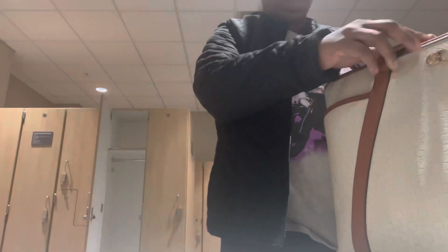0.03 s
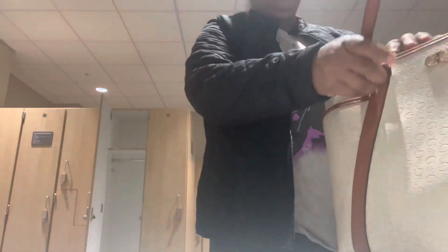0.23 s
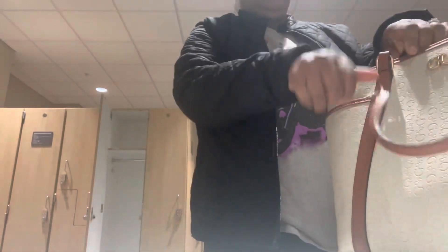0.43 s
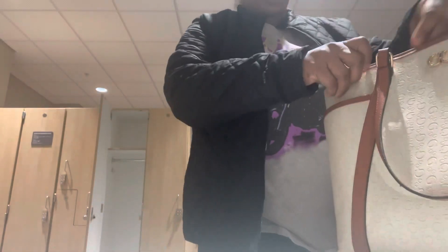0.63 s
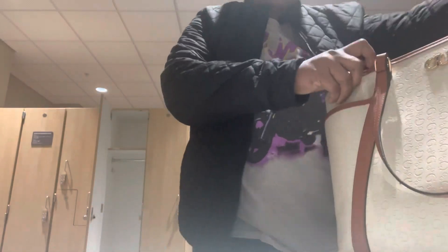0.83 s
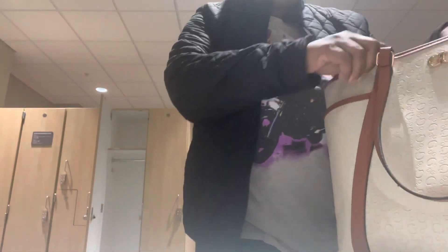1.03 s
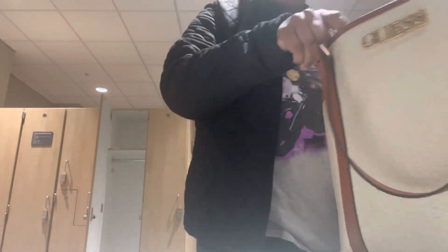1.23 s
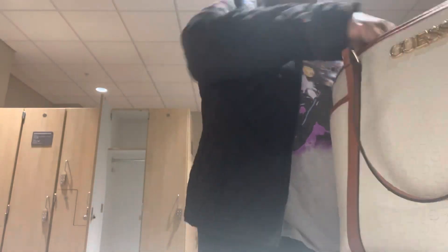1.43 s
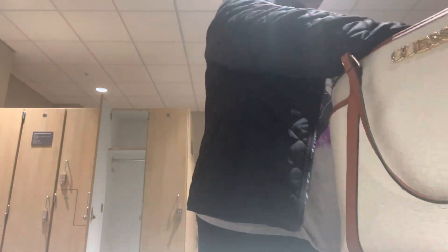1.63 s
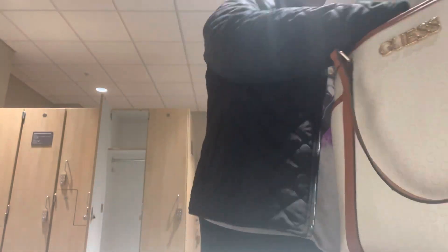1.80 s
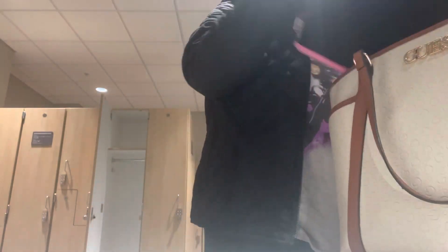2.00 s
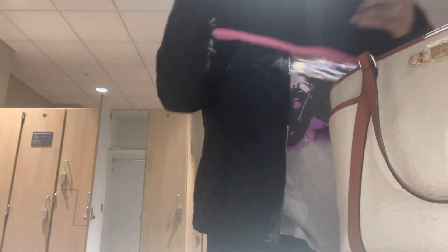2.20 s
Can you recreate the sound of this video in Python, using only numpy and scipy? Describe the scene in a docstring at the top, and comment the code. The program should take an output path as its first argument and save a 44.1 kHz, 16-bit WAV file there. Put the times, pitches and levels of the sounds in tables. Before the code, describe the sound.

A zipper on a stiff tote bag is pulled open close by. First, fingers and straps knock on the bag, near 0.1 seconds and loudest at 0.3. From 0.6 to 0.9 seconds the zipper buzzes, rising then falling in pitch. Softer knocks follow around 1.0 and 1.2 seconds, then light taps and jacket rustling until about 2.2. Ventilation hums steadily in the slightly echoing room.

```python
"""Unzipping a stiff bag

A stiff tote bag is handled close by in a locker room. Fingers and straps knock on its side.
The zipper opens in one quick pull: its teeth click so fast that they make a buzz, which rises
and falls with the speed of the hand. Jacket sleeves rustle over the hum of the ventilation."""
import sys
import numpy as np
from scipy import signal
from scipy.fft import rfft, irfft
from scipy.io import wavfile
from scipy.ndimage import uniform_filter1d

SR = 44100
rng = np.random.default_rng(int(sys.argv[2]) if len(sys.argv) > 2 else 0)


def unload_audio(sound):
    """Save the sound as a 16-bit wav file, at the path given as the first command line argument."""
    columns = np.transpose(np.atleast_2d(sound))
    # keep every value between -1 and 1, then stretch to whole-number steps
    steps = np.round(np.clip(columns, -1, 1) * 32767)
    wavfile.write(sys.argv[1], SR, steps.astype(np.int16))


N = 99401
FFT_SIZE = 2 ** 17
HZ = np.maximum(np.arange(FFT_SIZE // 2 + 1) * SR / FFT_SIZE, 1)


# How the hand pulls the zipper: (time [s], speed [teeth/s], level [dB])
PULL = [(.594, 280, -65), (.598, 290, -39), (.632, 340, -38), (.642, 370, -33.5), (.670, 430, -34),
        (.695, 560, -35), (.722, 750, -31), (.745, 955, -27), (.773, 920, -29), (.787, 1150, -28),
        (.802, 1040, -27), (.821, 1045, -26), (.829, 860, -25), (.844, 720, -28), (.872, 520, -31),
        (.895, 350, -38), (.908, 280, -60)]
# Tone of the clicking teeth and of the scraping slider: (frequency [Hz], level [dB])
TEETH_TONE = [(120, -24), (250, -4.5), (450, -1), (620, -3.5), (950, 0.5), (1400, 0), (2350, -3),
              (3100, -19.5), (4200, -15.5), (5200, -19), (10000, -51), (16000, -35)]
SCRAPE_TONE = [(150, -12), (500, -22), (1000, 12), (1700, 12), (2600, -0.5), (3400, -1), (6500, -8.5),
               (9000, -12), (11000, -24), (15000, -15)]
# The bag sings when a multiple of the zipper's speed meets one of its own notes:
# (multiple, note [Hz], width [Hz], level [dB])
BAG_NOTES = [(1, 412, 60, 3.5), (1, 755, 27, 0.5), (1, 990, 55, -4), (2, 2160, 200, -12.5),
             (4, 4160, 87, -6.5)]

def zipper(teeth_db=-3, scrape_db=-5.5, boom_db=-15, slack_s=.848, fade_db_per_s=800):
    """The slider clicks over each tooth and scrapes between them, while the hollow bag booms along."""
    t = np.arange(N) / SR
    times, speeds, levels = np.transpose(PULL)
    speed = np.interp(t, times, speeds) * (1 + .02 * drift(73))
    teeth_passed = np.cumsum(speed) / SR
    teeth = np.arange(1, int(teeth_passed[-1]))
    # Each click is a little early or late, louder or softer.
    timing, strength = rng.standard_normal((N // 20, 2))[:len(teeth)].T
    click_at = np.interp(teeth + .05 * timing, teeth_passed, np.arange(N)).astype(int)
    clicks = np.zeros(N)
    clicks[click_at] = from_db(3.5 * strength)
    buzz = apply_filter(clicks, tone_filter(curve(TEETH_TONE)) * bending_delay())
    buzz_level = np.sqrt(uniform_filter1d(buzz ** 2, size=900) + 1e-12)
    buzz = from_db(teeth_db) * buzz / buzz_level
    for multiple, hz, width_hz, db in BAG_NOTES:
        fluttering_gain = from_db(db + 3.5 * drift(70)) * resonance(multiple * speed, hz, width_hz)
        buzz += fluttering_gain * np.sin(2 * np.pi * multiple * teeth_passed)
    buzz *= from_db(-fade_db_per_s * np.maximum(t - slack_s, 0))  # the buzz fades as the pull slackens
    friction = rng.standard_normal(N) * np.exp(-2.5 * (teeth_passed % 1))  # a burst after each tooth
    scrape = rms_one(apply_filter(friction, tone_filter(curve(SCRAPE_TONE))))
    scrape *= from_db(scrape_db + .5 * np.log2(speed / speeds.max()))  # faster is a little louder
    hollow = resonance(HZ, centre_hz=182, width_hz=20)
    boom = from_db(boom_db) * rms_one(apply_filter(rng.standard_normal(N), hollow))
    loudness = from_db(np.interp(t, times, levels)) * (t > times[0]) * (t < times[-1])
    return loudness * (buzz + scrape + boom)


# Tone of the bag's stiff side: (frequency [Hz], level [dB])
SIDE_TONE = [(40, -52), (100, 3), (290, 8.5), (520, 5), (760, 7), (1000, 0), (1400, 9), (2000, -2),
             (3000, -9), (4200, -14.5), (6000, -19), (10000, -50), (14000, -25.5)]
# Each knock, with its own tone from low to high and how much of it goes into the room:
# (time [s], level [dB], thump [dB], knock [dB], snap [dB], tick [dB], echo [dB])
KNOCKS = [(0.0495, -33, 3, 2, -6, -22, -3), (0.0677, -29.5, 14, 8.5, 5.5, -4, 14.5),
          (0.0793, -17.5, 10, 9.5, 10.5, -22, 5.5), (.0820, -12, 4, 1, 2, 1, -3),
          (.0885, -15, 10, 3, -3, -6, -3), (0.251, -30.5, 2, -2, 13, -1, -16),
          (0.3244, -8, 8.5, 12, 7, -26, -2.5), (.4075, -25, -8, -4, 1, 5, -7),
          (.4108, -21, -8, -4, 4, 12, -8), (.5340, -20.5, 8, 3, 10.5, 2.5, -13),
          (1.0484, -22, -1.5, -9.5, -14, -6, -6), (1.2060, -23.5, 14.5, 13.5, -27, -10, -1),
          (1.2139, -16, 0, 2, 0, -9, -7), (1.6338, -25, 16, 0, -1, 6.5, -4),
          (1.9153, -24, 7, -5, -23, -12, -24), (2.06, -30, 12, 7.5, 4.5, 15.5, -4),
          (2.1688, -18.5, -27, -23, -21, -26, -3)]

def knocks():
    """Each touch bends the bag's side: a snap, then a thump. Returns the sound and its room share."""
    out, delay = np.zeros((2, N)), bending_delay()
    for time, db, thump, knock, snap, tick, echo in KNOCKS:
        touch = curve([(302, thump), (618, knock), (1160, 0), (2690, snap), (8300, tick)])
        pulse = irfft(tone_filter(curve(SIDE_TONE) + touch) * delay)
        start = int(time * SR)
        out[:, start:] += from_db([[db], [db + echo]]) * pulse[:N - start] / np.abs(pulse).max()
    return out


def bending_delay(lag_s=0.002167, top_hz=2736):
    """A filter for travel through the bag's stiff side, where low sounds move slower than high ones."""
    lag = lag_s * np.maximum(np.sqrt(top_hz / np.maximum(HZ, 200)) - 1, 0)
    return np.exp(-2j * np.pi * np.cumsum(lag) * SR / FFT_SIZE)


def pull_tab(start_s=.411, hz=12100, ring_s=.04, db=-44):
    """The metal tab gives one tiny, high ring as the fingers find it."""
    age = np.maximum(np.arange(N) / SR - start_s, 0)
    return from_db(db - 60 * age / ring_s) * np.sin(2 * np.pi * hz * age)


# Each soft swell of noise: cloth rubs, and the dull room tails after the two loud knocks:
# (middle time [s], half length [s], level [dB], extra treble [dB])
SWELLS = [(0.094, 0.027, -35, -22), (0.17, .02, -70, -4), (0.25, 0.014, -37, -25),
          (0.341, 0.017, -33.5, -27), (0.413, 0.014, -38, -10), (0.46, 0.027, -36, -7),
          (0.554, 0.044, -43.5, -26), (1.05, .028, -40.5, -4), (1.215, 0.04, -35, 4),
          (1.337, 0.022, -49, 17.5), (1.53, 0.17, -48.5, 5), (1.862, 0.072, -44, 9), (1.927, 0.031, -39, 6),
          (1.985, 0.041, -49.5, 16.5), (2.202, 0.049, -44.5, 12.5)]
# Tone of the cloth: (frequency [Hz], level [dB])
CLOTH_TONE = [(35, -46), (80, -9), (250, 8), (700, -0.5), (1450, 6.5), (1900, -3.5), (3300, -12.5),
              (5000, -21.5), (8000, -28.5), (11000, -38), (15000, -32.5)]

def rustle(creases_per_s=1800, swish_share=.28, treble_hz=4170, sleeve_db=-59):
    """Rubbing cloth crackles over a smooth swish; the same noise, dulled, gives two knocks a tail."""
    t = np.arange(N) / SR
    happens = rng.random(N) < creases_per_s / SR
    strength = from_db(2.5 * np.minimum(rng.exponential(1, N), 4))
    creases = rms_one(happens * strength * rng.choice([-1, 1], N))
    swish = swish_share * rng.standard_normal(N)
    cloth = rms_one(apply_filter(creases + swish, tone_filter(curve(CLOTH_TONE))))
    treble = apply_filter(cloth, 1 / (1 + (treble_hz / HZ) ** 4))
    power = from_db(sleeve_db + 5 * drift(10)) ** 2  # the jacket never rests
    for time, half_s, db, treble_db in SWELLS:
        swell = np.exp(-2 * ((t - time) / half_s) ** 2)
        power = power + from_db([[db], [db + treble_db]]) ** 2 * swell
    low_gain, treble_gain = np.sqrt(power) * from_db(1.6 * drift(25))  # cloth catches and lets go
    return low_gain * (cloth - treble) + treble_gain * treble


# How much louder the close sound is on the left: (frequency [Hz], left minus right [dB])
BALANCE = [(60, 5), (150, -4), (330, 9.5), (700, 0), (1300, -2.5), (2400, 4.5), (4400, 5), (15000, 2.5)]

def stereo_spread(x, left_lag_s=0.00027):
    """Spread the close sound in stereo: the left is slightly delayed; the balance shifts with pitch."""
    lean_db = curve(BALANCE) / 2
    left = from_db(lean_db) * np.exp(-2j * np.pi * HZ * left_lag_s)
    return apply_filter(x, np.array([left, from_db(-lean_db)]))


# Tone of the room's echo: (frequency [Hz], level [dB])
ECHO_TONE = [(60, -6.5), (250, -4.5), (600, -5.5), (1400, -2.5), (3000, -1), (8000, 2), (15000, 9)]

def room_echo(x, build_s=0.002, fade_s=0.25):
    """Sound bounces off the lockers and ceiling, building up quickly and dying away."""
    t = np.arange(N) / SR
    tail = surrounding_noise(1) * from_db(-60 * t / fade_s) * (1 - np.exp(-(t / build_s) ** 2))
    response = rfft(rms_one(tail) / np.sqrt(N), FFT_SIZE)
    return apply_filter(x, response * tone_filter(curve(ECHO_TONE)))


# Tone of the rushing air: (frequency [Hz], level [dB])
AIR_TONE = [(25, -22), (42, -30), (60, -2.5), (80, -1.5), (140, -1), (210, -5), (300, -10.5), (600, -21),
            (1550, -20), (1800, -30), (6500, -40.5), (11000, -49.5), (16000, -41)]

def ventilation(rush_db=-41.5, hum_db=-47):
    """Air rushes steadily, and the duct hums at its own low note."""
    hum = surrounding_noise(resonance(HZ, centre_hz=169.5, width_hz=4.7))
    rush = surrounding_noise(from_db(curve(AIR_TONE)))
    return from_db(rush_db) * rush + from_db(hum_db) * hum


# How alike left and right are for sound from all around: (frequency [Hz], likeness [-1 to 1])
LIKENESS = [(60, 0.99), (130, 0.7), (290, 0.49), (640, -0.18), (1400, -0.46), (3100, -0.4), (6800, 0.31),
            (15000, -0.56)]

def surrounding_noise(gain):
    """Stereo noise from all around; its deep bass is nearly the same on both sides."""
    shared, opposite = rfft(rng.standard_normal((2, FFT_SIZE)))
    alike = np.clip(curve(LIKENESS), -.99, .99)
    spectrum = np.sqrt(1 + alike) * shared + np.sqrt(1 - alike) * opposite * [[1], [-1]]
    return rms_one(irfft(gain * spectrum)[:, :N])


def resonance(hz, centre_hz, width_hz):
    """How strongly something rings when shaken: most at its own note, less on either side."""
    return 1 / (1 + ((hz - centre_hz) / width_hz) ** 2)


def drift(rate_hz):
    """A smooth random wobble, about 1 in size."""
    noise = rfft(rng.standard_normal(FFT_SIZE))
    return rms_one(irfft(noise / (1 + (HZ / rate_hz) ** 2))[:N])


def tone_filter(db):
    """A filter with these levels that rings only after it is struck (minimum phase)."""
    cepstrum = irfft(np.log(from_db(db)))
    cepstrum[1:FFT_SIZE // 2] *= 2
    cepstrum[FFT_SIZE // 2 + 1:] = 0
    return np.exp(rfft(cepstrum))


def apply_filter(x, response):
    """Pass a sound through a filter."""
    return irfft(rfft(x, FFT_SIZE) * response)[..., :N]


def curve(points):
    """Join (frequency [Hz], value) points, giving each octave equal space."""
    hz, value = np.transpose(points)
    return np.interp(np.log(HZ), np.log(hz), value)


def from_db(db):
    """Turn decibels into a number to multiply by."""
    return 10 ** (np.asarray(db) / 20)


def rms_one(x):
    """Scale a sound so its average strength (rms) is 1."""
    return x / np.sqrt(np.mean(x ** 2) + 1e-20)


def scene(zip_echo_db=-8, cloth_echo_db=-4):
    """The bag and jacket close by, with the room behind them."""
    zip_sound, cloth = zipper(), rustle()
    knock_sound, knocks_to_room = knocks()
    close = zip_sound + cloth + knock_sound + pull_tab()
    to_room = from_db(zip_echo_db) * zip_sound + from_db(cloth_echo_db) * cloth + knocks_to_room
    return stereo_spread(close) + room_echo(to_room) + ventilation()


def record(dry):
    """The very highest treble is cut off steeply."""
    cutoff_hz = 15850
    return signal.sosfiltfilt(signal.ellip(10, .05, 60, cutoff_hz, fs=SR, output="sos"), dry)


dry = scene()
out = record(dry)
unload_audio(out)
```